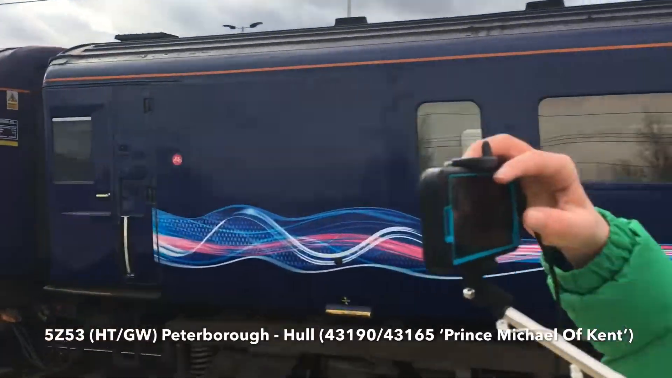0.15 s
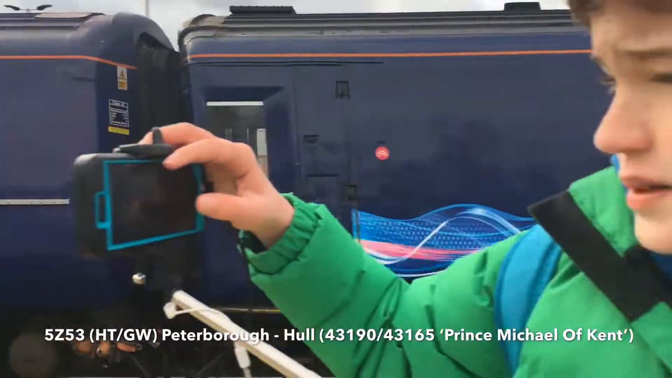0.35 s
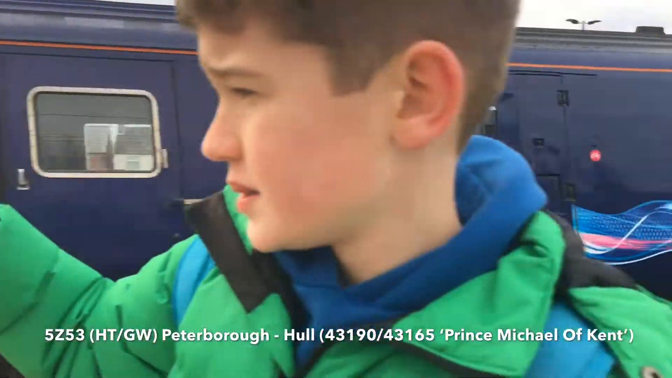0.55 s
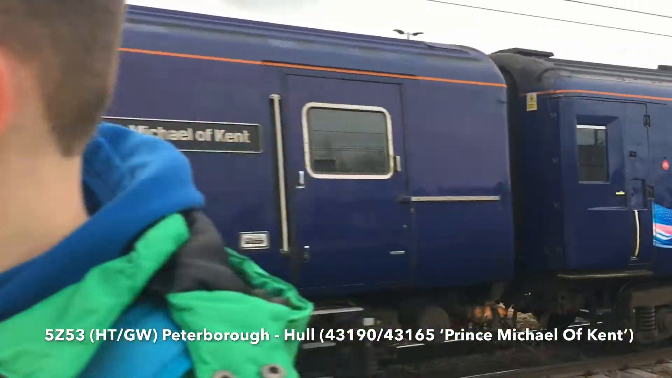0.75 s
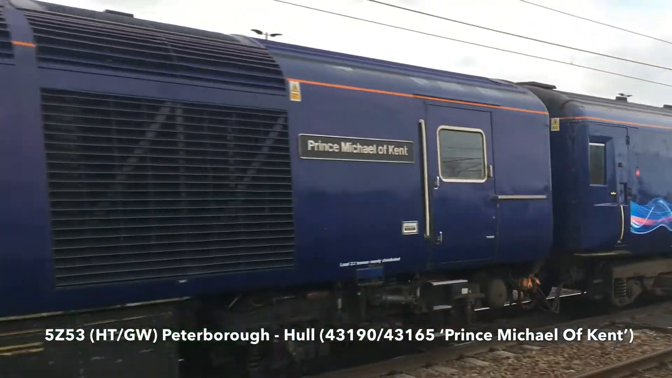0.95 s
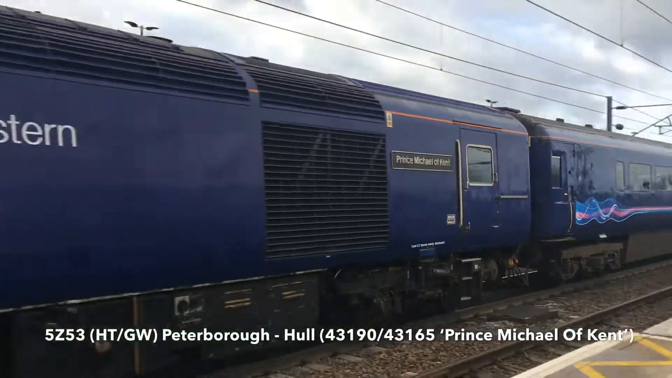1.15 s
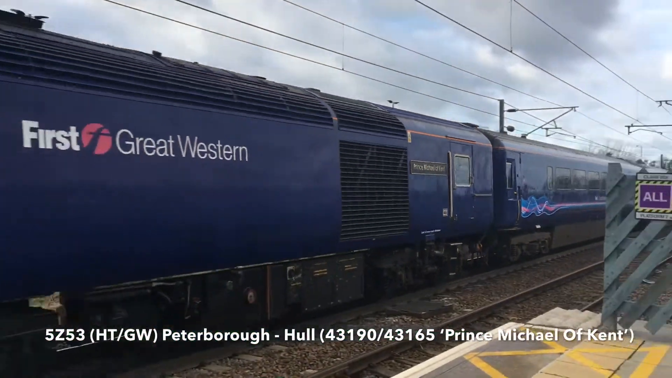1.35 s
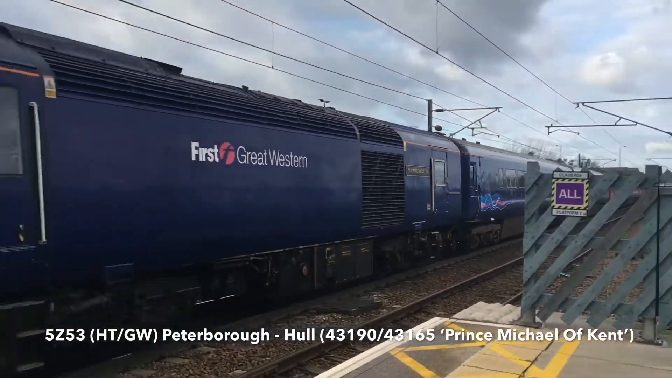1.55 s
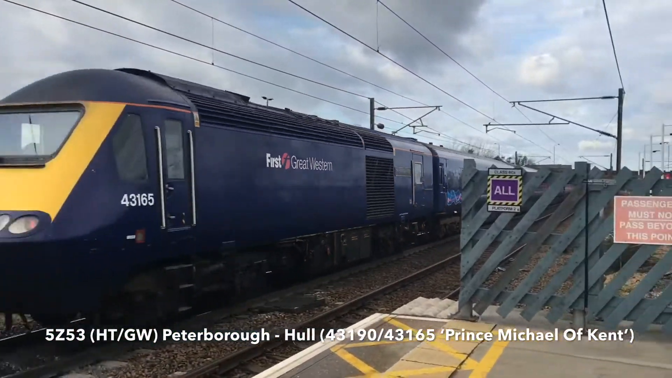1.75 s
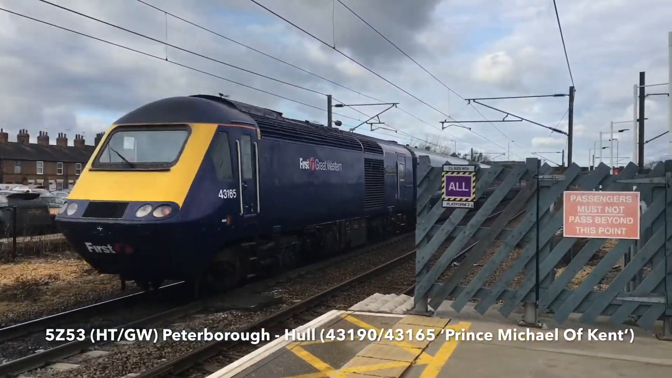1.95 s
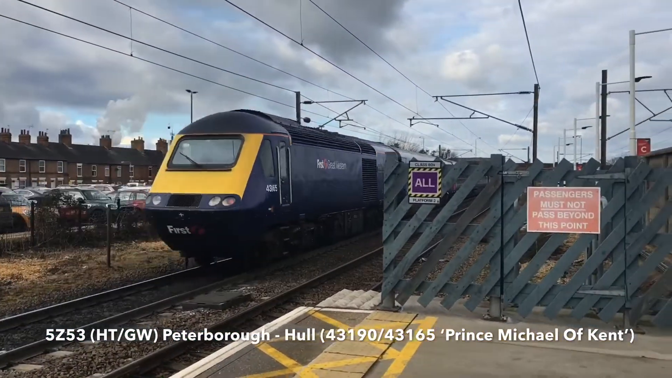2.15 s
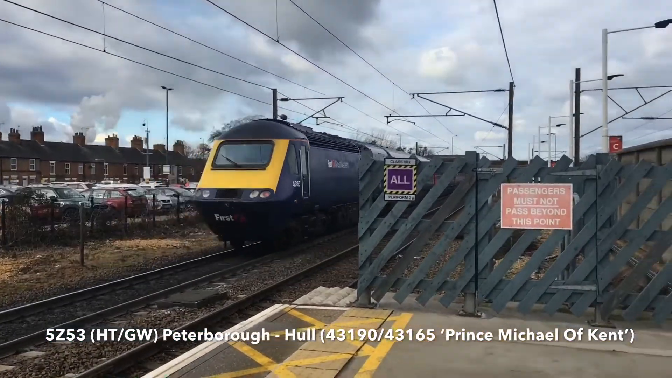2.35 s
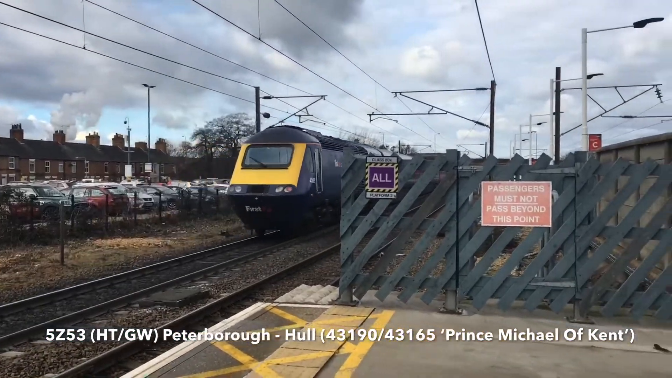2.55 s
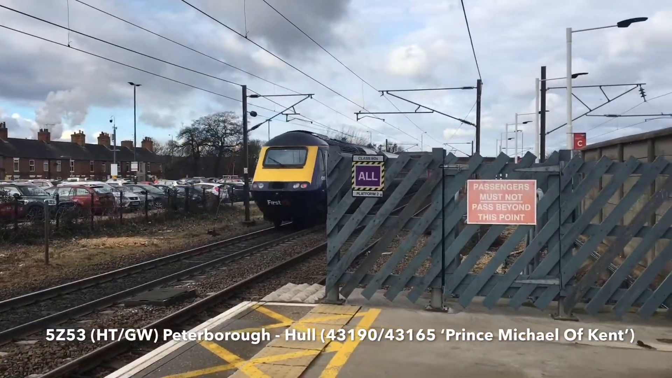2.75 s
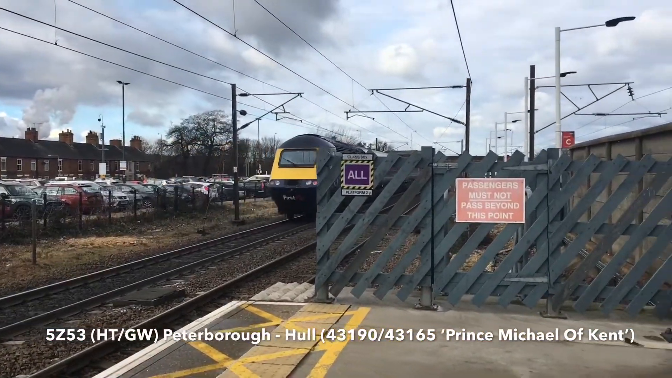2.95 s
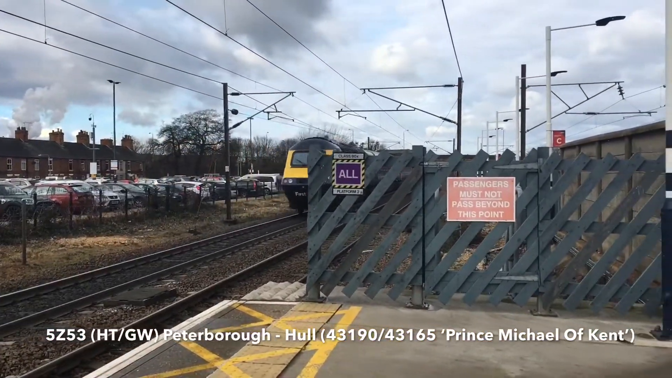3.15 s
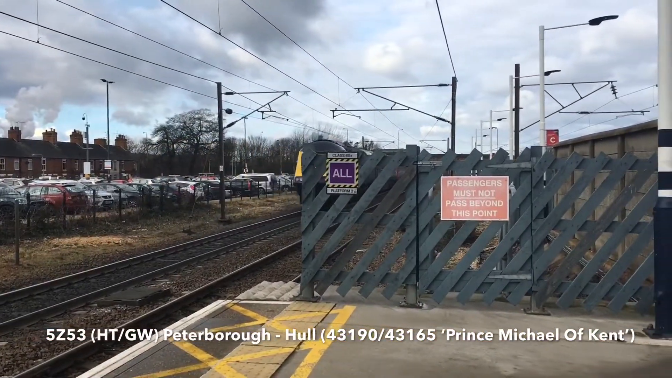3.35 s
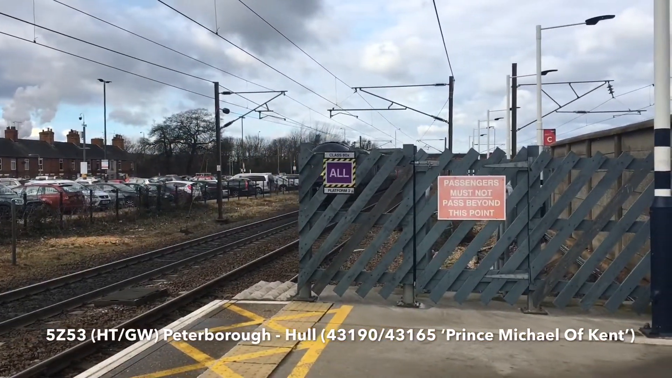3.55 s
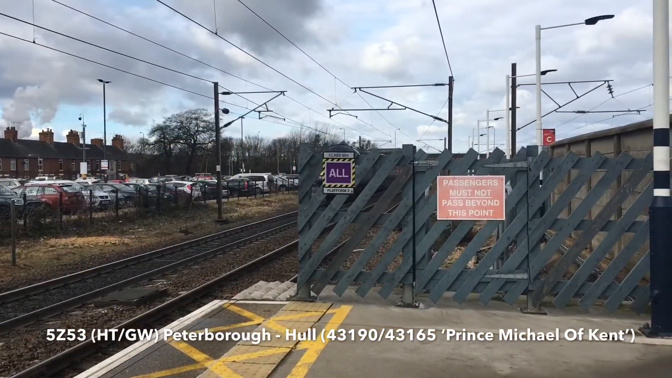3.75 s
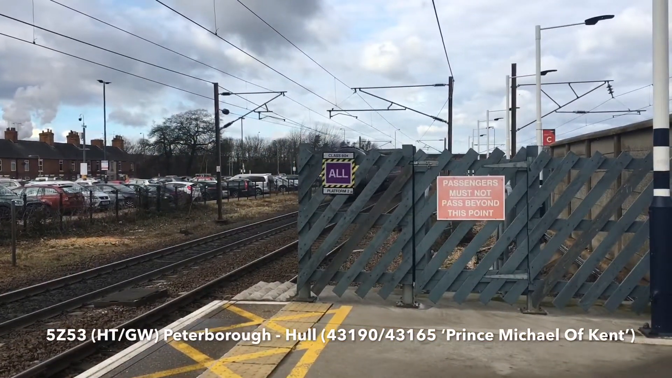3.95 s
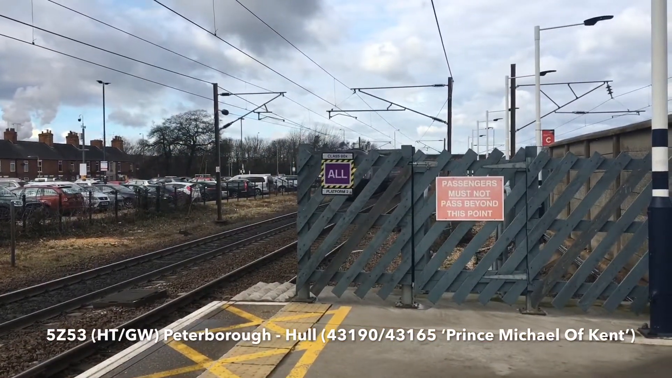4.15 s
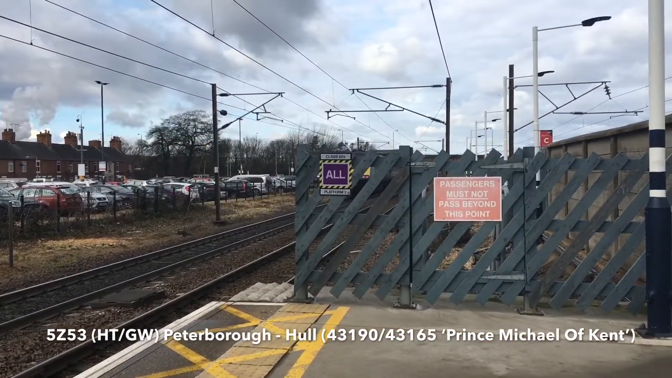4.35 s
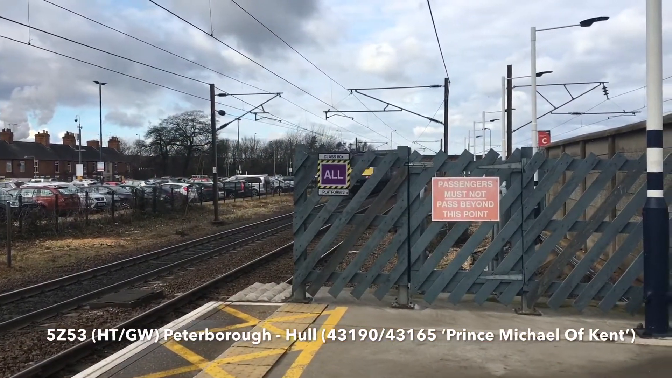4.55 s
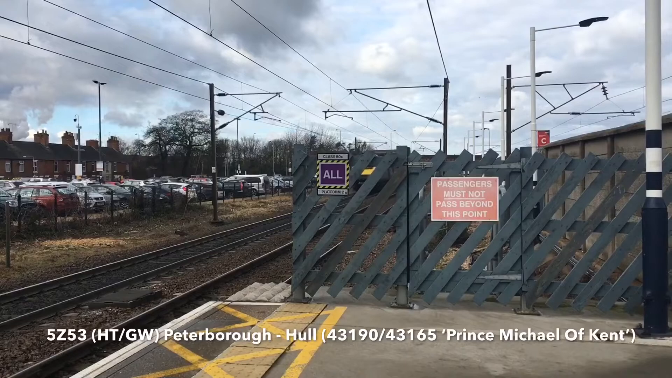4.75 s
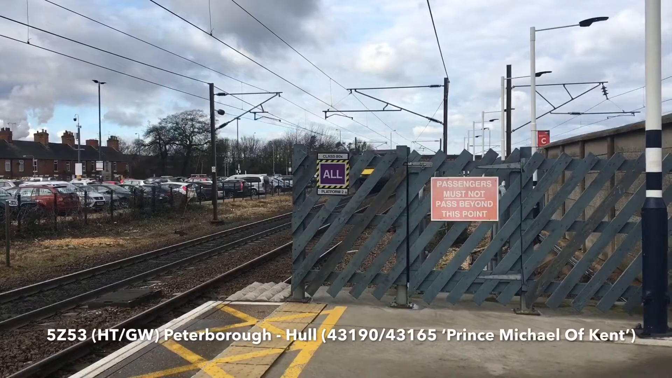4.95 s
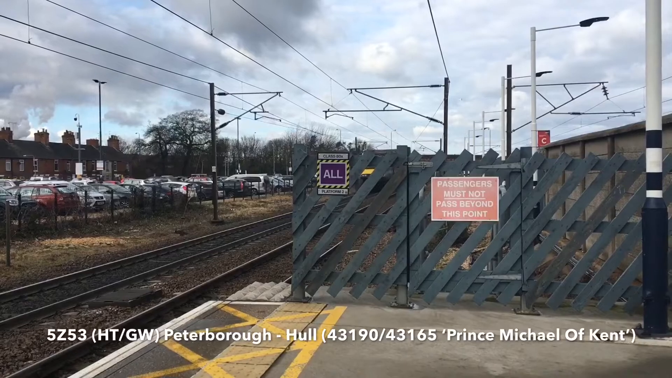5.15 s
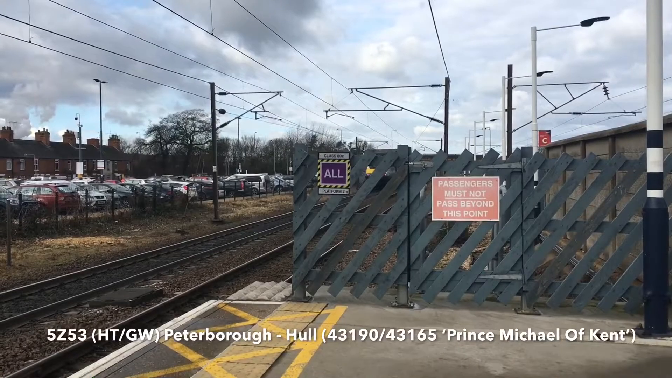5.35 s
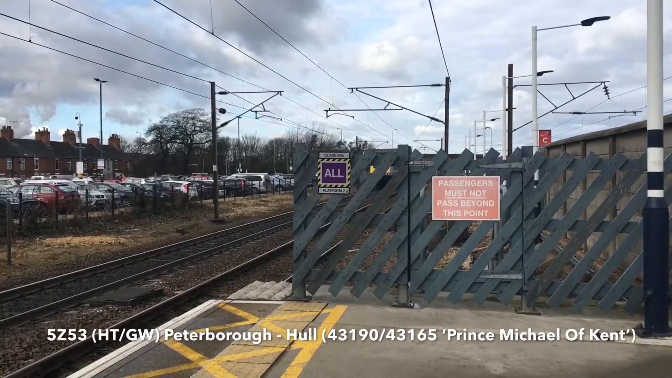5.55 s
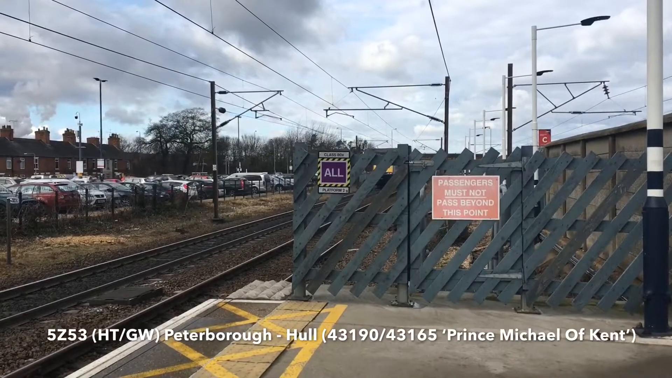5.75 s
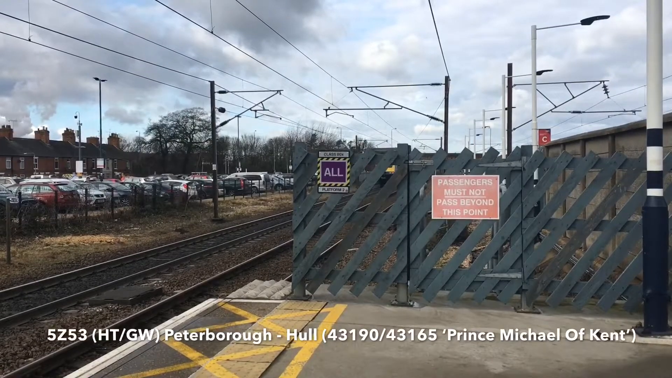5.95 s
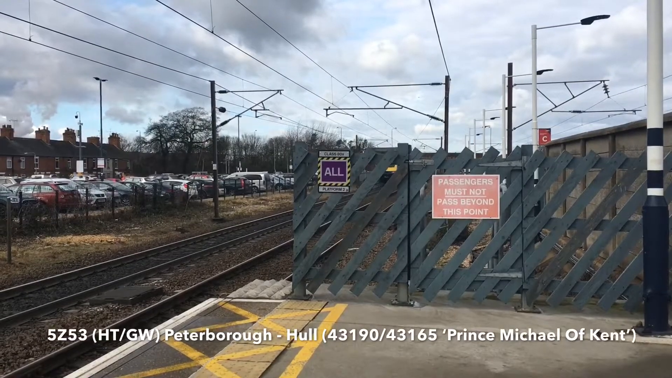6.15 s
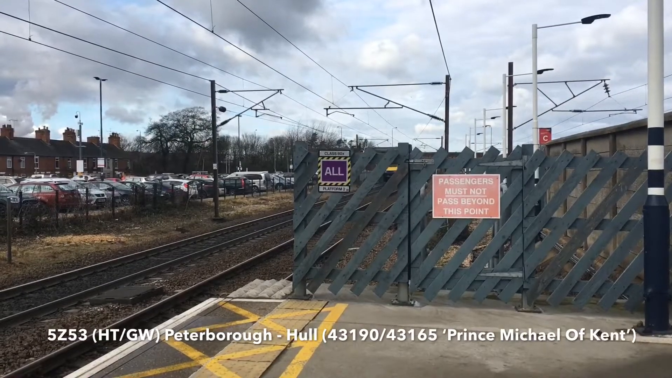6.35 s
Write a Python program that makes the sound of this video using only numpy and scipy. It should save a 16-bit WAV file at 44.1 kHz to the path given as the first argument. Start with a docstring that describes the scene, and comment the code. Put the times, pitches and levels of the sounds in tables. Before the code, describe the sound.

It starts at full loudness: rough, grinding wheel roar with metallic ringing, hiss and deep body rumble, very close. After about a second a diesel throb surges past and sinks in pitch, followed by wavering, hollow fan howl and a thin airy rush. The train draws away along the open line. Wind bumps the platform microphone in low flutters while the rails sing thinly, then sink, over a quiet breeze.

```python
"""The last coach and rear power car of a diesel express sweep past a platform and draw away, 6.5 seconds.
First the wheels roar, rattle, ring and scrape (coloured noise and short bursts), brief narrow tones stand out,
and a flange squeaks (a sine). The engine throbs (beating sines) and drops in pitch as it passes; then the fans
howl backwards (resonant noise and wavering sines), and an airy whistle and a fading rush (noise) join in.
Behind the train the rails sing faintly (narrow noise), sinking after five seconds, while puffs of wind (noise
bursts and pulses) buffet the microphone over a steady low breeze; a faint far hum (a sine) swells late."""
import sys
import numpy as np
from scipy import signal
from scipy.fft import rfft, irfft, next_fast_len
from scipy.io import wavfile
from scipy.ndimage import uniform_filter1d, map_coordinates

SR = 44100
rng = np.random.default_rng(int(sys.argv[2]) if len(sys.argv) > 2 else 0)


def wav_record(signal):
    """Record a signal, one row per channel, as 16-bit PCM in the file named by sys.argv[1]."""
    frames = np.transpose(np.atleast_2d(signal))
    bounded = np.clip(frames, -1, 1)
    # unit amplitude maps onto the largest positive 16-bit level
    quanta = np.round(bounded * 32767).astype(np.int16)
    wavfile.write(sys.argv[1], SR, quanta)


N = 286629
TIME_S = np.arange(N) / SR

SPEED_M_PER_S, SOUND_M_PER_S = 15.5, 343  # the train, and sound in air
TRACK_M = 4.5  # distance to the track
ENGINE_PASS_S, FAN_PASS_S = 1.14, 1.335  # when each is abreast


# Exhaust tones of the engine. Each row: multiple of the shaft speed, relative level in dB.
EXHAUST_ORDERS = [(4, -32), (5, -27), (6, -20), (7, -3), (8, 0), (9, -9), (11, -14), (12, -11), (13, -11.5),
                  (15, -12.5), (18, -12), (19, -17)]
EIGHTH_ORDER_HZ = 63.66  # eighth shaft order as the engine recedes
THROB_DB, THROB_FALL_DB = -24, 1.47  # level abreast before the surge, loss per doubling of distance
SURGE_S, SURGE_LENGTH_S, SURGE_DB = 0.94, 0.091, 2.5  # swell as the exhaust goes by: peak, half length, gain


def engine(drift_rad=0.23, unsteady_db=1.1):
    """Beating: uneven cylinders excite every shaft order, and neighbours beat about eight times a second."""
    shaft = 2 * np.pi * np.cumsum(EIGHTH_ORDER_HZ * doppler(ENGINE_PASS_S)) / SR / 8
    # the overtones beam backwards
    overtone_db = beamed(0.44, -1.7, behind_db=8, loss_db_per_m=0.14)
    tones = np.zeros(N)
    for order, db in EXHAUST_ORDERS:
        level_db = db + unsteady_db * wobble(3.58)
        if order > 9:
            level_db = level_db + overtone_db
        phase = order * shaft + rng.uniform(0, 2 * np.pi) + drift_rad * wobble(6)
        tones += amp(level_db) * np.sin(phase)
    surge_db = SURGE_DB * np.exp(-((TIME_S - SURGE_S) / SURGE_LENGTH_S) ** 2)
    return amp(THROB_DB + surge_db + spreading(ENGINE_PASS_S, THROB_FALL_DB)) * unit(tones)


# The last three bogies. Each row: time abreast in seconds, roar in dB before the gains of its near and far parts.
BOGIES = [(.31, -23), (.96, -23.5), (1.56, -27)]
AHEAD_DB, AHEAD_FADE_DB_PER_S = -36.5, 0.56  # wheels far down the line: level at the start, fading


def rolling():
    """Energy summation: all roar (dB), last bogies below their loudest (dB), and the share sounding close."""
    near = sum(amp(db) ** 2 * (TRACK_M / passing(s)[0]) ** 2 for s, db in BOGIES)
    ahead = amp(AHEAD_DB - AHEAD_FADE_DB_PER_S * TIME_S) ** 2
    total = near + ahead
    close = (near / total) ** 2.93
    return 10 * np.log10(total), 10 * np.log10(near / near.max()), close


# Roar spectrum of wheels close by. Each row: frequency in Hz, spectral level in dB.
NEAR_ROAR = [(150, -43), (330, -1.5), (480, -6.5), (640, 2.5), (780, -2.5), (880, -8), (1040, -2.5),
             (1330, -3.5), (1450, -7.5), (1650, -5), (1870, -9.5), (2150, -8), (2900, -15), (4500, -30)]
# Roar spectrum of wheels far down the line. Each row: frequency in Hz, spectral level in dB.
FAR_ROAR = [(150, -39), (330, -18), (470, -4.5), (630, 3.5), (750, 1.5), (820, -1.7), (930, 0),
            (1150, -0.7), (1400, -7.5), (1600, -5.5), (1750, -7.5), (2030, -7.5), (2400, -14), (3800, -24),
            (4900, -37)]


def wheel_roar():
    """Rolling contact: rough steel on steel excites broadband noise, duller with distance."""
    roar_db, _, close = rolling()
    near = np.sqrt(close) * amp(3.5) * patchy(noise(colour(NEAR_ROAR)), depth_db=1.5)
    far = np.sqrt(1 - close) * amp(3.0) * noise(colour(FAR_ROAR))
    return (near + far) * amp(roar_db) * rattle(rate=30, decay=0.0081, depth=0.22)


# Rumble spectrum of the bogies and bodies. Each row: frequency in Hz, spectral level in dB.
BODY_RUMBLE = [(20, -32), (42, 3), (80, 0.5), (125, 0), (175, -1.5), (245, 3), (330, 1.3), (410, -1),
               (520, -5.5), (900, -4.5), (2000, -68)]
BODY_PASS_S, BODY_M = 0.96, 9.55  # middle of the bodies: time abreast, effective distance
BODY_DB, BODY_FALL_DB = -17, 8  # level abreast before the hold, loss per doubling of distance
BODY_HOLD_DB = -2  # the bodies are long, so the rumble levels off here while alongside


def body_rumble():
    """Extended source: long bodies radiate a low rumble whose level flattens while they are alongside."""
    distance_db = np.minimum(spreading(BODY_PASS_S, BODY_FALL_DB, BODY_M), BODY_HOLD_DB)
    return amp(BODY_DB + distance_db) * noise(colour(BODY_RUMBLE))


# Hiss spectrum of wheels close by. Each row: frequency in Hz, spectral level in dB.
NEAR_HISS = [(1500, -3.5), (2900, -2.5), (3700, 2), (4250, 0), (5300, -1), (6200, -3), (7600, -8.5),
             (9000, -8), (10450, -12.5), (11200, -13), (12500, -17), (15600, -21.5)]
# Hiss spectrum of the distant line. Each row: frequency in Hz, spectral level in dB.
FAR_HISS = [(1500, -4), (3500, 4), (4400, 2), (5700, -2.5), (7500, -10), (9000, -13), (12500, -12),
            (15600, -18)]
HISS_DB, HISS_GROWS = -31.5, 0.9  # hiss at the loudest bogie roar before the loss below, its dB per dB of roar
HISS_LOSS_DB_PER_S = 3  # air and fence swallow the hiss once the last bogie has gone


def wheel_hiss():
    """Absorption: contact noise hisses beside the bogies and is lost with distance to a faint steady remainder."""
    _, near_db, _ = rolling()
    gone_s = np.maximum(TIME_S - BOGIES[-1][0], 0)
    level = amp(HISS_DB + HISS_GROWS * near_db - HISS_LOSS_DB_PER_S * gone_s)
    near = level * patchy(noise(colour(NEAR_HISS)), depth_db=1.35) * rattle(rate=37, decay=0.0067, depth=0.14)
    return near + amp(-59.5) * noise(colour(FAR_HISS))


# Wheel and bogie resonances. Each row: frequency in Hz when receding, width in Hz, relative level in dB.
WHEEL_MODES = [(290, 14, 0), (355, 13, 1), (613, 13, 0), (694, 8.3, 3), (897, 30, -5.5), (967, 17, 1),
               (1204, 23, -3), (1470, 43, -22), (2038, 82, -11)]


def wheel_ringing():
    """Modal resonance: rolling noise excites the steel, whose modes slide down in pitch as they pass."""
    roar_db, _, close = rolling()
    return close * amp(roar_db - 2.5) * moving(resonances(WHEEL_MODES), 0.8)


def rattle(rate, decay, depth):
    """Random impacts: jolts, rate a second, each lift the roar and die away over decay seconds."""
    jolts = (rng.random(N) < rate / SR) * amp(3 * rng.standard_normal(N))
    dying = signal.lfilter([1], [1, -np.exp(-1 / (decay * SR))], jolts)
    return unit(1 + depth * uniform_filter1d(dying, size=130))


# Fan blade tones; close pairs beat. Each row: frequency in Hz when receding before the fans' speed drift,
# level in dB abreast before the loss over distance, loss in dB per metre, and the time in seconds
# when the grille turns towards the listener.
BLADE_TONES = [(359, -37, .5, 1.75), (382, -35.5, .52, 1.85), (406, -36.5, .68, 1.9), (424, -43, .6, 1.9),
               (709, -45, .29, 1.8), (735, -35.5, .55, 1.25), (747, -44.5, .17, 2.0)]
BEHIND_DB, FAN_RISE_PER_S = 10.5, .004  # gain heard from behind; share by which the fans speed up
TONE_RISE_S = .07  # how quickly a tone comes in


def blade_tones(flutter_rad=.42, wander_hz=2.6, swing_db=2.2):
    """Blade passing: each fan sounds a wavering tone that comes in as its grille turns to the listener."""
    speed = doppler(ENGINE_PASS_S) * (1 + FAN_RISE_PER_S * (TIME_S - FAN_PASS_S))
    whine = np.zeros(N)
    for hz, db, loss, start in BLADE_TONES:
        level = amp(beamed(FAN_PASS_S, db, BEHIND_DB, loss) + swing_db * wobble(12))
        level *= .5 + .5 * np.tanh((TIME_S - start) / TONE_RISE_S)
        phase = 2 * np.pi * np.cumsum(hz * speed + wander_hz * wobble(9)) / SR
        whine += level * np.sqrt(2) * np.sin(phase + flutter_rad * wobble(40))
    return whine


# Fan duct resonances. Each row: frequency in Hz when receding, width in Hz, relative level in dB.
DUCT_MODES = [(386, 46, -5), (640, 140, -7), (727, 27, 2), (966, 78, -5.5), (1610, 90, -10.5),
              (2002, 96, -9.5), (2286, 140, -14.5), (2520, 160, -15), (3230, 200, -20), (3765, 50, -21),
              (4450, 44, -26.5)]
DUCT_DB, DUCT_BEHIND_DB, DUCT_LOSS_DB_PER_M = -31.5, 8.5, 0.42  # abreast before distance loss; gain behind; loss
GRILLE_DB, GRILLE_SIDE_DB = -3, 12  # treble gain seen end-on, and what side-on adds to it


def duct_howl():
    """Duct resonance and directivity: fan noise howls in its ducts, and the grilles beam its treble sideways."""
    howl = patchy(moving(resonances(DUCT_MODES), ENGINE_PASS_S), depth_db=1.8)
    treble = filtered(howl, lambda hz: 1 - 1 / (1 + (hz / 1300) ** 6))
    lift_db = GRILLE_DB + GRILLE_SIDE_DB * TRACK_M / passing(FAN_PASS_S)[0]
    level = amp(beamed(FAN_PASS_S, DUCT_DB, DUCT_BEHIND_DB, DUCT_LOSS_DB_PER_M))
    return level * (howl + (amp(lift_db) - 1) * treble)


def fans():
    """Superposition: duct howl and blade tones waver together in level."""
    return amp(0.95 * wobble(7.6)) * (duct_howl() + blade_tones())


VENT_S, VENT_RISE_S = 1.33, .04  # comes into earshot, how fast
VENT_DB, VENT_FADE_DB_PER_S = -44, 17  # level before the fade, fading


def vent():
    """Jet noise: an airy rush sets in as the roof outlets go by and fades steadily."""
    t = TIME_S - VENT_S
    level = (.5 + .5 * np.tanh(t / VENT_RISE_S)) * amp(VENT_DB - VENT_FADE_DB_PER_S * np.maximum(t, 0))
    return level * noise(resonances([(8800, 900, 0)]))  # centre Hz, width Hz, dB


# Bells of band noise: mostly wheels brushing the rail; at 1.85 s a long airy whistle near 6 kHz, probably from
# the engine's turbocharger; at 2.62 and 3.05 s soft airy swells of treble as the train draws away.
# Each row: peak time in seconds, half length in seconds, centre in Hz, width in Hz, level at the peak in dB.
NOISE_BELLS = [(0.202, .25, 900, 450, -27.5), (.25, 0.5, 2140, 90, -42), (.27, .14, 4450, 300, -42),
               (.2, .2, 6100, 700, -45), (.3, 0.14, 660, 150, -26), (.31, .087, 12950, 5000, -42),
               (.42, 0.21, 730, 46, -30.5), (.634, .036, 7600, 2600, -36), (.76, .05, 7800, 900, -45),
               (0.55, 0.3, 1310, 85, -30), (.882, .011, 14000, 4000, -45), (1.05, .02, 14000, 4000, -49),
               (1.12, .06, 1040, 280, -26), (1.16, .09, 14000, 4000, -47), (1.851, 0.55, 6000, 700, -45),
               (1.921, 0.27, 1620, 60, -37), (2.206, .04, 3800, 120, -46), (2.62, .2, 5900, 700, -53),
               (3.05, .36, 10500, 4500, -58)]


def scrapes_and_airy_swells():
    """Band-limited noise: brushing wheels, an airy whistle and treble swells each rise and fall as a bell."""
    return sum(amp(db) * swell(s, length, resonances([(hz, width, 0)])) for s, length, hz, width, db in NOISE_BELLS)


# Brief narrow tones standing out of the roar and fan howl; the last is a faint far hum near 650 Hz that swells
# slowly late in the scene. Each row: peak time in seconds, half length in seconds, frequency in Hz,
# level at the peak in dB.
NARROW_TONES = [(.02, .05, 2099, -35), (.16, .06, 732, -29), (.39, .06, 322, -25), (.45, .06, 753, -27.5),
                (.44, .05, 2174, -36), (.43, .06, 1076, -30), (.54, .07, 1033, -27.5),
                (.55, .05, 2379, -36.5), (.69, .05, 1281, -29), (.74, .08, 672, -26), (.77, .04, 2454, -36),
                (.84, .06, 1001, -27.5), (.94, .06, 613, -25), (1.04, .05, 2174, -34.5),
                (1.11, .07, 968, -27.5), (1.23, .06, 645, -24.5), (1.29, .06, 344, -25),
                (1.38, .05, 2562, -38), (1.43, .06, 1324, -31.5), (1.45, .07, 732, -27.5),
                (1.47, .09, 2070, -35.5), (1.5, .05, 1658, -35), (1.69, .06, 742, -22.5),
                (1.72, .06, 2217, -33), (1.79, .05, 2465, -39.5), (1.79, .07, 2008, -36.5),
                (1.87, .06, 1636, -35), (2.03, .06, 1625, -38), (2.09, .05, 2250, -38),
                (2.12, .06, 2013, -37.5), (2.3, .06, 2024, -38.5), (2.54, .06, 2013, -41),
                (5.7, .74, 651, -44.5)]


def narrow_tones():
    """Tonal prominence: narrow tones stand out of the noise; each swells and dies away."""
    return sum(amp(db) * narrow_tone(s, length, hz) for s, length, hz, db in NARROW_TONES)


def narrow_tone(s, length, hz, flutter_rad=.3):
    """Phase modulation: a sine of unsteady phase under a bell around time s, of rms 1 at its top."""
    t = TIME_S - s
    phase = 2 * np.pi * (hz * t + rng.random()) + flutter_rad * wobble(45)
    return np.sqrt(2) * np.exp(-2 * (t / length) ** 2) * np.sin(phase)


# Course of a brief flange squeak. Each row: time in seconds, frequency in Hz, peak level in dB.
FLANGE_SQUEAK = [(.82, 4420, -65), (.85, 4450, -31), (.87, 4560, -36), (.90, 4530, -72)]


def squeak():
    """Stick-slip: the slipping flange sounds one gliding, unsteady tone."""
    hz, db = curves(FLANGE_SQUEAK)
    slipping = (TIME_S > FLANGE_SQUEAK[0][0]) & (TIME_S < FLANGE_SQUEAK[-1][0])
    return slipping * amp(db) * np.sin(2 * np.pi * np.cumsum(hz) / SR + .4 * wobble(150))


# Middle waves that travel far along the rail. Each row: frequency in Hz, width in Hz, relative level in dB.
RAIL_MIDDLE = [(5130, 110, -3), (7150, 520, 5), (8507, 250, -4), (9750, 400, -8)]
# High waves that travel far along the rail. Each row: frequency in Hz, width in Hz, relative level in dB.
RAIL_HIGH = [(11370, 600, -1.5), (11500, 90, 5), (13800, 2200, -12)]
SING_DB, SING_HIGH_DB, SING_CLOSE_DB = -62.5, -63.7, 10  # middle and high before the drop; high's gain near wheels
SING_HOLD_S, SING_RELEASE_S, SING_DROP_DB = 5.02, 0.5, 6  # holds until then, time to sink, drop


def rail_singing():
    """Guided waves: the rail carries its ringing back from far down the line, and it finally sinks."""
    sunk_db = SING_DROP_DB * np.clip((TIME_S - SING_HOLD_S) / SING_RELEASE_S, 0, 1)
    close = rolling()[2]
    middle = amp(SING_DB - sunk_db + 1.2 * wobble(10)) * noise(resonances(RAIL_MIDDLE))
    high_db = SING_HIGH_DB + SING_CLOSE_DB * close - sunk_db + 0.9 * wobble(10)
    return middle + amp(high_db) * noise(resonances(RAIL_HIGH))


# Gusts on the microphone. Each row: peak time in seconds, half length in seconds, level in dB before buffeting.
PUFFS = [(2.45, 0.12, -26), (2.64, 0.06, -21), (2.8, 0.08, -22), (3.42, 0.072, -25.5), (5.45, 0.16, -31),
         (5.836, 0.066, -27.5), (6.4, 0.32, -31.5)]
BUFFET_RATE_PER_S, BUFFET_DB = 40, 3  # how fast and how deeply a gust flutters


def gusts():
    """Turbulent pressure: puffs of wind swell as low noise and flutter."""
    puffs = sum(amp(db) * swell(s, length, eddy(length, db)) for s, length, db in PUFFS)
    return puffs * unit(amp(BUFFET_DB * wobble(BUFFET_RATE_PER_S)))


EDDY_HZ, EDDY_S, EDDY_DB = 161, 0.038, -21  # a reference gust: upper edge, half length, level
EDDY_SHORT_POWER, EDDY_STRONG_POWER = 0.28, 0.31


def eddy(length, db):
    """Turbulence scaling: the shorter and stronger a puff, the higher its spectrum reaches."""
    shortness = (EDDY_S / length) ** EDDY_SHORT_POWER
    edge_hz = EDDY_HZ * shortness * amp(db - EDDY_DB) ** EDDY_STRONG_POWER
    return colour([(24, -25), (46, 0), (edge_hz, -1), (2 * edge_hz, -20), (8 * edge_hz, -62)])


# Single eddies that thump the microphone. Each row: time in seconds, centre in Hz, peak level in dB.
THUMPS = [(2.353, 130, -15), (2.589, 139, -13), (2.642, 109, -13), (2.664, 170, -14), (2.71, 120, -13.5),
          (2.742, 190, -14), (2.757, 100, -12), (2.789, 290, -6), (2.849, 200, -11), (2.865, 100, -12),
          (2.882, 110, -16), (3.311, 90, -14.5), (3.407, 90, -15), (3.425, 140, -21), (3.439, 120, -12.5),
          (3.478, 129, -13), (5.339, 210, -19.5), (5.41, 95, -18), (5.514, 85, -24), (5.541, 95, -23),
          (5.812, 160, -22), (5.852, 200, -26.5), (5.885, 100, -23), (6.186, 190, -20), (6.426, 85, -25),
          (6.474, 85, -20)]


def thumps():
    """Pressure pulses: single sharp eddies cross the microphone."""
    return sum(amp(db) * thump(s, hz) for s, hz, db in THUMPS)


def thump(s, hz):
    """A vortex pulse: a short push between two weaker pulls."""
    u = np.clip(np.pi * hz * (TIME_S - s), -10, 10)
    return (1 - 2 * u ** 2) * np.exp(-u ** 2)


def breeze():
    """Flow noise: open air makes a steady low rumble on the microphone, slowly swinging in level."""
    air = colour([(23, -32), (43, 6.0), (75, 3.5), (110, -13.0), (150, -6.5), (220, -9.5), (500, -38)])
    return amp(-34.5 + 1 * wobble(3.1)) * noise(air)


def passing(s, side_m=TRACK_M):
    """Geometry of a pass: distance in metres and cosine of the bearing (1 = going away), abreast at time s."""
    gone_m = SPEED_M_PER_S * (TIME_S - s)
    metres = np.hypot(side_m, gone_m)
    return metres, gone_m / metres


def doppler(s):
    """Doppler effect: heard pitch over the receding pitch, for a source abreast at time s."""
    mach = SPEED_M_PER_S / SOUND_M_PER_S
    return (1 + mach) / (1 + mach * passing(s)[1])


def moving(response, s):
    """Doppler shift of noise: its colour slides down as it goes by at time s."""
    read = np.cumsum(doppler(s))
    return unit(map_coordinates(noise(response, size=N + SR), [read]))


def spreading(s, fall_db, side_m=TRACK_M):
    """Spreading loss: level in dB, 0 when abreast, fall_db lower at each doubling of distance."""
    return -fall_db * np.log2(passing(s, side_m)[0] / side_m)


def beamed(s, db, behind_db, loss_db_per_m):
    """Directivity: level in dB of a source that faces backwards and slips behind the fence as it recedes."""
    metres, away = passing(s)
    return db + behind_db * away - loss_db_per_m * metres


def amp(db):
    """Logarithmic level: decibels to gain."""
    return 10 ** (np.asarray(db) / 20)


def unit(x):
    """Normalisation of power: scale to rms 1."""
    return x / np.sqrt(np.mean(x ** 2) + 1e-20)


def curves(rows):
    """Linear interpolation: one value per sample for each column after the time."""
    s, *cols = np.transpose(rows)
    return [np.interp(TIME_S, s, c) for c in cols]


def wobble(rate):
    """Slow random modulation: a smooth curve with rate knots a second."""
    knots = rng.standard_normal(int(N * rate / SR) + 4)
    return map_coordinates(knots, [np.arange(N) * rate / SR])


def filtered(x, response):
    """Linear filtering: the spectrum of x times a response of frequency."""
    m = next_fast_len(len(x) + 8192)
    return irfft(rfft(x, m) * response(np.fft.rfftfreq(m, 1 / SR)), m)[:len(x)]


def colour(points):
    """Spectral shaping: the response through (Hz, dB) points on a log axis, steep above the last."""
    f, db = np.transpose(points)

    def response(hz):
        gain_db = np.interp(np.log(hz + 1), np.log(f), db, left=-120)
        return amp(gain_db) * np.minimum(1, f[-1] / (hz + 1)) ** 4
    return response


def resonances(modes):
    """Modal summation: the powers of (Hz, width, dB) modes with steep skirts add up."""
    def response(hz):
        power = sum(amp(db) ** 2 / (1 + ((hz - c) / w) ** 2 * 2) ** 2 for c, w, db in modes)
        return np.sqrt(power)
    return response


def noise(response, size=N):
    """Filtered randomness: coloured noise of rms 1."""
    return unit(filtered(rng.standard_normal(size), response))


def swell(s, length, response):
    """Amplitude envelope: a bell of coloured noise around time s, of rms 1 at its top."""
    t = np.arange(-SR, SR) / SR
    bell = np.exp(-2 * (t / length) ** 2)
    burst = noise(response, size=len(t)) * bell
    burst *= np.linalg.norm(bell) / np.linalg.norm(burst)
    return np.interp(TIME_S, s + t, burst, left=0, right=0)


PATCH_HZ, PATCH_S = 190, .07  # size of the loud and soft patches


def patchy(x, depth_db):
    """Time-frequency modulation: patches of random gain laid over a sound."""
    z = signal.stft(x, nperseg=1024)[2]
    field = rng.standard_normal(z.shape)
    for _ in range(2):
        field = uniform_filter1d(field, size=max(1, round(PATCH_HZ * 1024 / SR)), axis=0)
        field = uniform_filter1d(field, size=max(1, round(PATCH_S * SR / 512)), axis=1)
    return unit(signal.istft(z * amp(depth_db * unit(field)), nperseg=1024)[1][:N])


def scene():
    """Superposition: the train and the wind add up at one microphone."""
    wheels = wheel_roar() + body_rumble() + wheel_hiss() + wheel_ringing()
    details = scrapes_and_airy_swells() + narrow_tones() + squeak()
    wind = gusts() + thumps() + breeze()
    return (engine() + wheels + fans() + vent() + details + rail_singing() + wind)[None]


# Narrow dips in the microphone's response. Each row: frequency in Hz, width in Hz, level in dB of the part cancelled.
MICROPHONE_DIPS = [(4920, 210, -7.5), (10400, 470, -9.5)]
TOP_HZ = 15720  # band limit


def record(dry):
    """Frequency response: the microphone has two dips in its treble, and nothing passes above the band limit."""
    def response(hz):
        return (1 - resonances(MICROPHONE_DIPS)(hz)) * (hz < TOP_HZ)
    return np.array([filtered(channel, response) for channel in dry])


dry = scene()
out = record(dry)
wav_record(out)
```